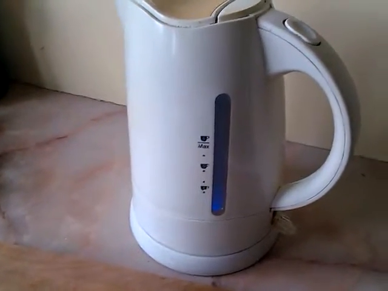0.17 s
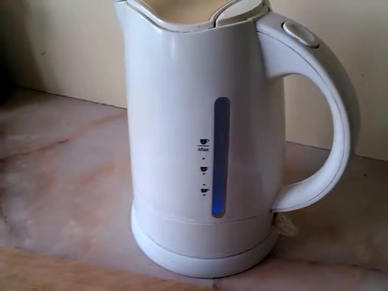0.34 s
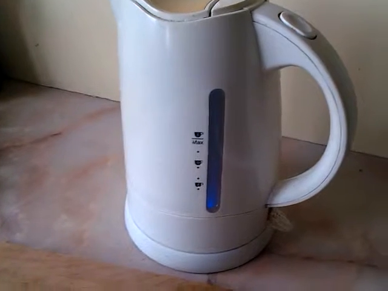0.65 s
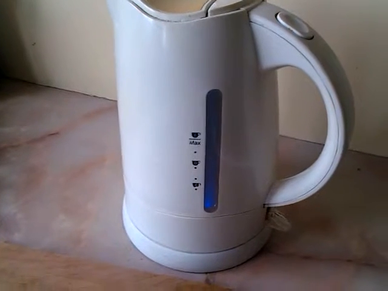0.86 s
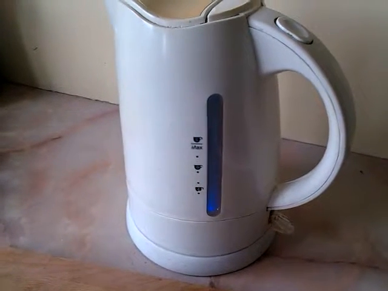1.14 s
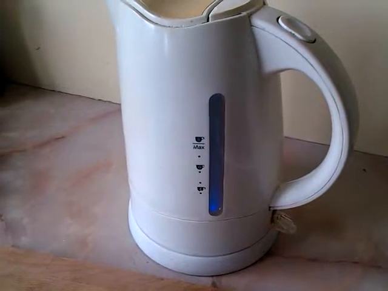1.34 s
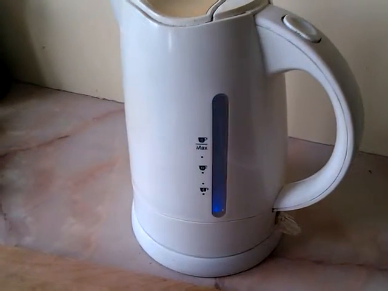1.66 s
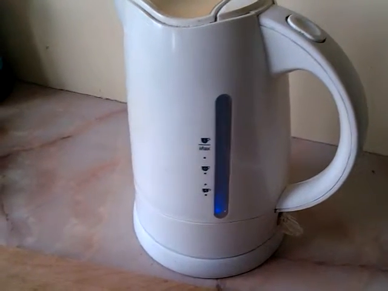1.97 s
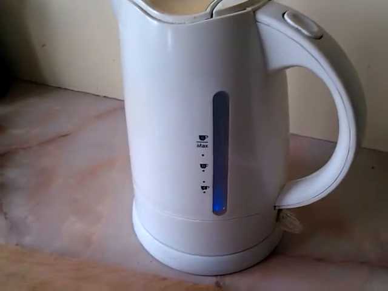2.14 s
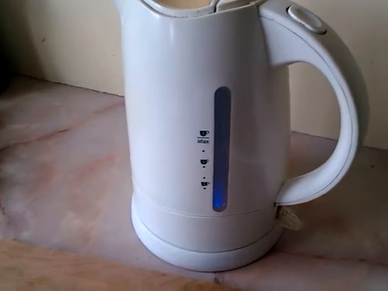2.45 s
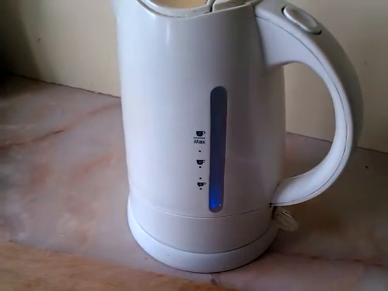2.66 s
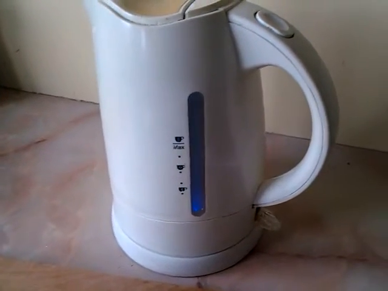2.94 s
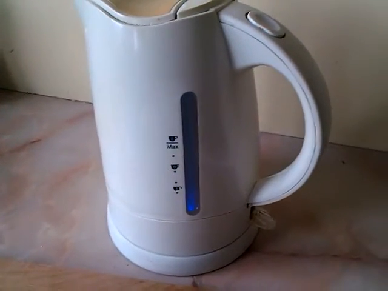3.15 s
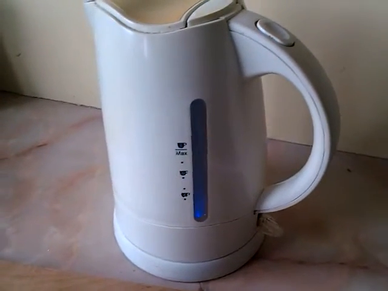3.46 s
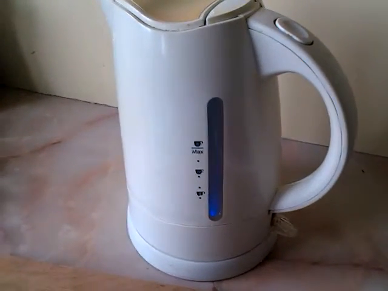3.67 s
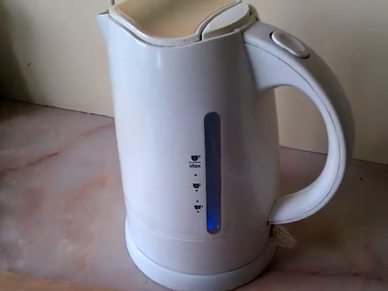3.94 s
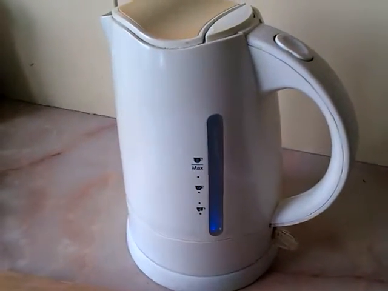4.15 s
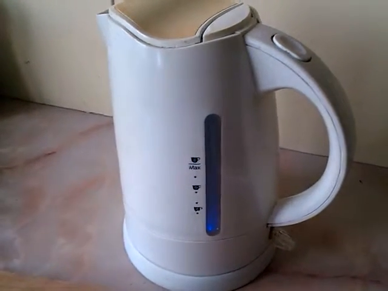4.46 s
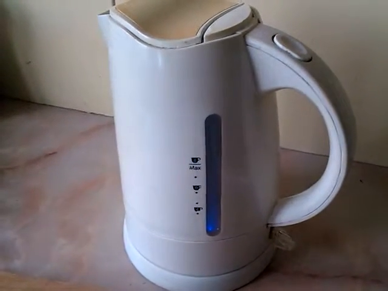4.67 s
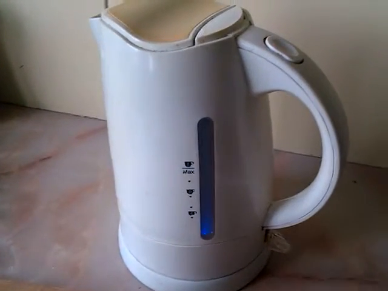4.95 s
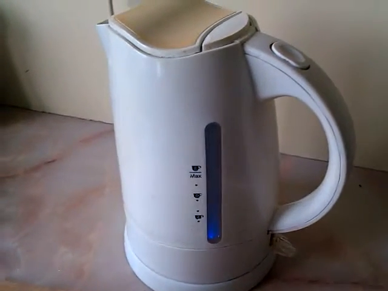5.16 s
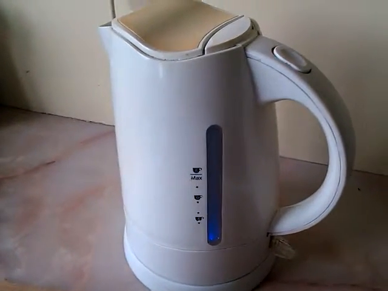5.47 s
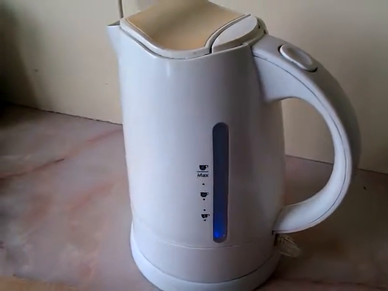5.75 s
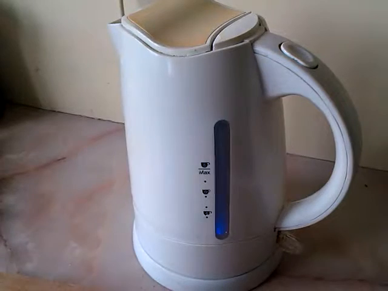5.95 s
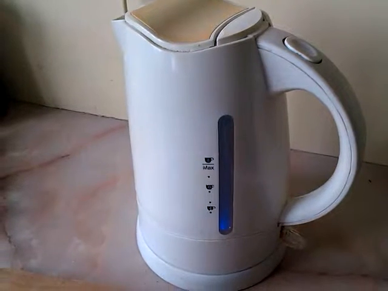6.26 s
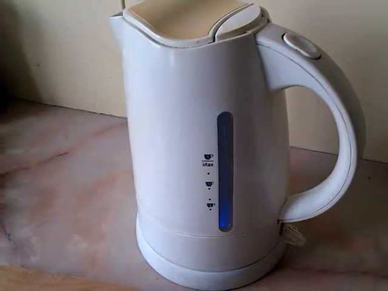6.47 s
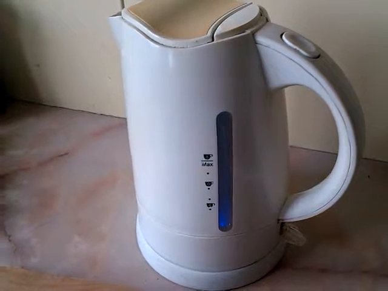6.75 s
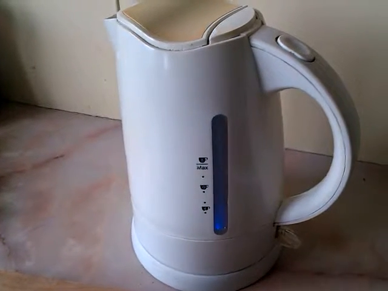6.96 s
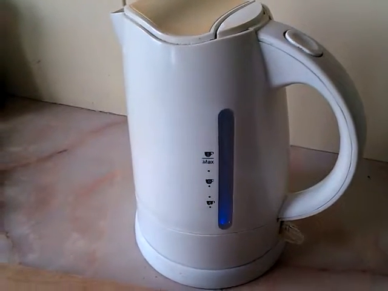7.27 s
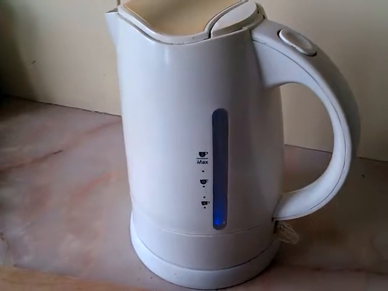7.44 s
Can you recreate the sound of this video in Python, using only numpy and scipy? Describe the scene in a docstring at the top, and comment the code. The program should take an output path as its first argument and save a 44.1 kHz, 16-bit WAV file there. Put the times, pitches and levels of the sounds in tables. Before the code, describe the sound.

Steady fizzing hiss of a kettle warming up, swelling louder, with two sharp wooden knocks late on, echoing briefly in the room.

```python
"""In a kitchen, a plastic electric kettle heats water on a stone worktop. Thousands of steam bubbles collapse
on its element and ring the base, the wall and the air above the water: random clicks through resonances make a
growing, grainy hiss. Tones add a murmur, soft gulps, faint singing and one tick of the plastic. Elsewhere
something wooden, perhaps a cupboard door, bangs shut and bumps; a second hard knock, from another object,
follows and settles. These are noise bursts through wood resonances. Faint air noise and a hum lie underneath."""
import sys
import numpy as np
from scipy import signal
from scipy.fft import rfft, irfft
from scipy.io import wavfile
from scipy.ndimage import uniform_filter1d

SR = 44100
rng = np.random.default_rng(int(sys.argv[2]) if len(sys.argv) > 2 else 0)


def file_out(sig):
    """Save sig as 16-bit WAV at sys.argv[1]."""
    # one column per channel
    cols = np.atleast_2d(sig).T
    # limit, then scale
    lim = np.clip(cols, -1, 1)
    pcm = np.round(lim * 32767).astype(np.int16)
    wavfile.write(sys.argv[1], SR, pcm)


N = 335601
TIME = np.arange(N) / SR

# colour of the air noise in the quiet room: [f/Hz, relative level/dB]
ROOM_COLOUR = [(20, 0.5), (50, -16.5), (100, -14.5), (250, -8), (500, -1.5), (2000, -16.5), (9000, -55.5)]
# modes of the thin tick from the plastic: [f/Hz, relative level/dB, t60/s]
TICK_MODES = [(4560, -3.5, 0.13), (6160, -7, 0.15), (6760, -13, .06), (7290, -11, 0.093)]
# contacts as the wood slams, chatters and bumps, then as another object knocks hard and settles: [t/s, relative
# level/dB, contact time/ms, rattle t60/s, room share/dB]
KNOCK_CONTACTS = [(5.6333, 12.5, 0.39, .033, -5), (5.6351, 14.5, .36, 0.038, -4),
                  (5.6463, 12.5, 0.4, 0.056, -4), (5.680, 8.5, 0.96, .08, 0.5), (5.698, 6, 1.7, .08, 0),
                  (5.716, 3.5, 1.3, .1, 1.5), (5.742, 1, 1.6, 0.074, 0), (6.078, -3.5, 1.6, .1, 0),
                  (6.098, 1.5, .9, .06, -4), (6.112, 1, 1, 0.095, 0), (6.19, -10, 1.6, 0.1, 2),
                  (7.4575, 8, 1.7, 0.034, -3.5), (7.492, .5, 4, .1, 1), (7.5475, 0, 1.6, .04, -1.5)]
# where a hard edge lands and shakes the room: [t/s, clack gain/dB, ring gain/dB, boom gain/dB]
EDGE_HITS = [(5.635, -6, -23, -15), (5.697, -20, -32, -24), (6.094, -42, -36, -40), (7.4574, 2.5, -34, -13),
             (7.5475, -16, -42, -28)]
# what the wood rings with: [f/Hz, relative level/dB, t60/s]
WOOD_MODES = [(107, -13, .6), (131, -8, .25), (189, -7, 0.28), (221.3, -12, .3), (268, -9, .2),
              (404, -10, .4), (526, -3, .34), (608, -2, 0.38), (701, -1.5, .3), (791, -5, .3),
              (840, -0.5, 0.3), (881, .5, 0.21), (898, 1.5, 0.21), (1015, -2, .25), (1318, -4, 0.15),
              (1610, -4, .12), (1750, -4, 0.11)]
# overall colour of the wood: [f/Hz, relative level/dB]
WOOD_COLOUR = [(30, -36.5), (70, -21.5), (120, -12.5), (260, -6.5), (370, -4.5), (900, -0.5), (1600, -7),
               (3000, -10), (4800, -9.5), (8000, -18), (11000, -34), (16000, -45)]
# the short clack of a hard edge: [f/Hz, relative level/dB, t60/s]
CLACK_MODES = [(980, -13.5, 0.029), (1316, -15, 0.04), (1400, -1, 0.002), (1750, -22, .015)]
# the kitchen's deepest modes: [f/Hz, relative level/dB, t60/s]
BOOM_MODES = [(40, -24.5, 0.69), (64, -26, .35), (79, -25, .4), (110, -24, 0.6)]
# loose bubbles that gulp softly: [t/s, starting pitch f/Hz, peak level/dB, swell time/s]
GULP_EVENTS = [(.005, 378, -46, 0.012), (.74, 368, -49, .025), (1.38, 392, -45.5, 0.02),
               (1.49, 393, -47, 0.017), (1.56, 388, -43, .012), (2.14, 610, -42, 0.016),
               (2.19, 403, -48, .025), (2.62, 374, -45, 0.018), (2.99, 369, -46, 0.016),
               (3.55, 388, -44.5, 0.026), (3.59, 224, -48.5, 0.019), (4.585, 394, -40.5, 0.028),
               (4.89, 585, -42, .018)]
# thin singing lines, before the swell below: [f/Hz, grain width/Hz, level/dB]
SINGING_LINES = [(4322, 14, -51), (5160, 40, -62), (5220, 26, -58)]
# how the singing comes and goes: [t/s, gain/dB]
SINGING_SWELL = [(3.6, -30), (4.0, -4), (4.22, 2), (4.55, -4), (4.9, .5), (5.1, -2), (5.28, 3), (5.5, -3),
                 (5.85, 1), (6.05, -2), (6.25, 3), (6.55, -1), (7.6, -2)]
# murmur in the hollow above the water: [f/Hz, width/Hz, level at full heat/dB]
SIMMER_TONES = [(153.1, 14, -61), (372.4, 18, -59), (400, 20, -59)]
# heating makes the hiss climb, quickly at first: [t/s, level against full level/dB]
HEATING = [(0, -8.3), (.38, -8.3), (.62, -5.5), (.82, -5.5), (1.3, -5), (1.55, -3.5), (2.05, -2.5),
           (2.55, -1.9), (3.1, -2), (3.75, -2), (4.5, -1), (5.5, -1), (5.95, -0.34), (6.3, -0.5), (6.9, 0),
           (7.6, -0.1)]
# colour of the collapses through the water and the wall: [f/Hz, relative level/dB]
FIZZ_COLOUR = [(60, -58), (130, -27), (240, -28.5), (340, -19.5), (500, -21), (700, -19.5), (900, -12),
               (1090, -9.5), (1180, -3.5), (2700, -1), (3150, -8), (4000, -12.5), (6300, -21), (8200, -34),
               (9200, -49.5), (10000, -73.5), (12000, -90.5)]
# resonances of the air above the water, then of base and wall: [f/Hz, width/Hz, lift or dip/dB]
KETTLE_RESONANCES = [(153.3, 14, 7.5), (385, 81, 3), (488, 20, -5), (603.7, 31, 11.5), (673, 37, -3.5),
                     (917, 21, 3.5), (1108, 22, -9.5), (1206, 130, 2.5), (1490, 37, -4.5), (1594, 70, 2.7),
                     (2190, 16, 2.5), (2230, 20, 1.5), (2433, 28, 2.5), (2487, 60, 6), (2690, 80, 1),
                     (2850, 50, -5), (2944, 73, 3), (3310, 51, 2.5), (3870, 260, -1.5), (4480, 66, -0.5),
                     (5020, 99, -1.5), (5640, 120, 2.5)]
# single big collapses: [t/s, relative level/dB]
POP_EVENTS = [(.652, -21), (1.531, -18), (1.6428, -14.5), (1.8966, -16.5), (2.3359, -17), (2.545, -16),
              (2.61, -15), (2.886, -17.5), (3.619, -15), (3.808, -16.5), (3.8366, -15.5), (4.3993, -15),
              (4.536, -15.5), (4.8753, -16), (5.283, -14), (5.882, -14.5), (6.512, -14.5), (6.7733, -13.5),
              (7.1975, -12.5)]


def undb(db):
    """Turn decibels into gain."""
    return 10 ** (np.asarray(db) / 20)


def unit(x):
    """Scale to rms 1."""
    return x / np.sqrt(np.mean(x ** 2))


def burst(x):
    """Scale to energy 1."""
    return x / np.sqrt(np.sum(x ** 2))


def fade(t, t60):
    """Exponential decay, 60 dB down after t60 seconds."""
    return np.exp(-np.log(1000) * t / t60)


def add(out, s, sound):
    """Mix a sound in from time s on."""
    start = max(int(s * SR), 0)
    out[start:start + len(sound)] += sound[:max(N - start, 0)]


def ring(x, response):
    """Let a signal excite whatever has this impulse response."""
    return signal.fftconvolve(x, response)[:len(x)]


def low_pass(x, hz, order=2):
    """Keep what lies below hz."""
    return signal.sosfilt(signal.butter(order, hz, fs=SR, output="sos"), x)


def band(x, lo_hz, hi_hz, order=3):
    """Keep what lies between two frequencies."""
    edges = [lo_hz, min(hi_hz, SR / 2 - 1)]
    return signal.sosfilt(signal.butter(order, edges, "bandpass", fs=SR, output="sos"), x)


def body(colour, resonances=(), size=16384):
    """Response of an object with a broad colour and resonances; it sounds only after being hit."""
    hz = np.fft.rfftfreq(size, 1 / SR)
    points, dbs = np.transpose(colour)
    db = np.interp(np.log(hz + 1), np.log(points), dbs)
    for centre, width, lift_db in resonances:
        db = db + lift_db / (1 + (2 * (hz - centre) / width) ** 2)
    # folding the cepstrum forward gives minimum phase: the energy comes as early as possible
    cepstrum = irfft(np.log(undb(db)))
    cepstrum[1:size // 2] *= 2
    cepstrum[size // 2 + 1:] = 0
    response = irfft(np.exp(rfft(cepstrum)))
    return burst(response[:size // 2])


def struck(modes):
    """One second of decaying sines, as from a struck object."""
    t = TIME[:SR]
    return sum(undb(db) * np.sin(2 * np.pi * hz * t) * fade(t, t60) for hz, db, t60 in modes)


def walk(rate):
    """Random levels held for 1 / rate s, then smoothed twice and scaled to rms 1."""
    hold = int(SR / rate)
    steps = np.repeat(rng.standard_normal(N // hold + 2), hold)
    smooth = uniform_filter1d(uniform_filter1d(steps, hold), hold)
    return unit(smooth[:N])


def scatter(t60):
    """Dense random reflections that die away, energy 1."""
    return burst(rng.standard_normal(SR) * fade(TIME[:SR], t60))


def kitchen(build_s=0.0035, split_hz=1500, bass_hz=330):
    """The room's echo builds up in a few ms and dies away, the bass lasting longest."""
    bass = low_pass(scatter(t60=0.47), bass_hz)
    middle = band(scatter(t60=0.41), bass_hz, split_hz, order=2)
    treble = band(scatter(t60=0.41), split_hz, SR / 2, order=2)
    return burst((bass + middle + treble) * (1 - np.exp(-TIME[:SR] / build_s)))


def room_tone(air_db=-54.5, hum_hz=261, hum_db=-65.5):
    """Faint coloured air noise and a steady pitch whose level wavers slightly."""
    air = unit(ring(rng.standard_normal(N), body(ROOM_COLOUR)))
    hum = np.sin(2 * np.pi * hum_hz * TIME) * undb(hum_db + 1.5 * walk(5.1))
    return undb(air_db) * air + hum


def blow(contact_ms, rattle_t60, room_db, push_db=-6, rattle_top_hz=5200, soft_ratio=6):
    """A short push, a rattle of the wood and the room's answer; the longer the contact, the duller."""
    sound = low_pass(scatter(rattle_t60) + undb(room_db) * kitchen(), rattle_top_hz)
    sound[0] += undb(push_db)
    contact_hz = 1000 / contact_ms
    return low_pass(low_pass(sound, contact_hz, order=1), soft_ratio * contact_hz)


def knocks(boom_rise_s=0.041, lift_db=5.0, panel_rise_s=0.0015, echo_db=-19):
    """Each contact rattles the wood; a hard edge adds a clack, rings the panel and makes the room boom."""
    blows, clacks, tones = np.zeros((3, N))
    boom = struck(BOOM_MODES) * (1 - np.exp(-TIME[:SR] / boom_rise_s))
    clack = band(struck(CLACK_MODES), lo_hz=880, hi_hz=2700, order=2)
    panel = struck(WOOD_MODES) * (1 - np.exp(-TIME[:SR] / panel_rise_s))
    for at, db, contact_ms, t60, room_db in KNOCK_CONTACTS:
        add(blows, at, undb(db) * blow(contact_ms, t60, room_db))
    for at, clack_db, ring_db, boom_db in EDGE_HITS:
        add(clacks, at, undb(clack_db) * clack)
        add(tones, at, undb(ring_db) * panel + undb(boom_db) * boom)
    # a mode that rings longer has a narrower resonance
    resonances = [(hz, np.log(1000) / (np.pi * t60), lift_db) for hz, _, t60 in WOOD_MODES]
    wood = ring(blows, body(WOOD_COLOUR, resonances, size=32768))
    return wood + clacks + undb(echo_db) * ring(clacks, kitchen()) + tones


def tick(at_s=6.567, ring_db=-30, rise_s=0.002, snap_db=-27, snap_t60=0.061, echo_db=-8):
    """The warming plastic slips once: a small noise snap and a brief ring of its modes."""
    out = np.zeros(N)
    add(out, at_s, undb(ring_db) * struck(TICK_MODES) * (1 - np.exp(-TIME[:SR] / rise_s)))
    snap = band(rng.standard_normal(SR) * fade(TIME[:SR], snap_t60), lo_hz=3900, hi_hz=7400, order=8)
    add(out, at_s, undb(snap_db) * snap)
    return out + undb(echo_db) * ring(out, kitchen())


def gulps(glide_per_s=0.3):
    """Each loose bubble swells into a short, soft tone that rises a little as it climbs."""
    out, t = np.zeros(N), TIME[:SR // 3]
    for at, hz, db, swell_s in GULP_EVENTS:
        phase = 2 * np.pi * hz * (t + glide_per_s * t ** 2 / 2)
        swell = t / swell_s * np.exp(1 - t / swell_s)
        add(out, at, undb(db) * swell * np.sin(phase))
    return out


def singing(waver_hz=20, flicker_db=1.2, rough=0.7):
    """The hot kettle sings: thin lines, wavering in pitch and level, follow the swell table."""
    out = np.zeros(N)
    for hz, width_hz, db in SINGING_LINES:
        phase = 2 * np.pi * np.cumsum(hz + waver_hz * walk(30)) / SR
        grain = 1 + rough * unit(low_pass(rng.standard_normal(N), width_hz / 2))
        out += undb(db) * unit(grain * np.sin(phase) * undb(flicker_db * walk(8)))
    return out * undb(np.interp(TIME, *np.transpose(SINGING_SWELL)))


def simmer(patchy_db=3.5, patch_per_s=6.5, growth=0.85):
    """Stirring water sets the hollow murmuring in patches; it grows a little less than the hiss."""
    out = np.zeros(N)
    for hz, width_hz, db in SIMMER_TONES:
        tone = band(rng.standard_normal(N), hz - width_hz / 2, hz + width_hz / 2, order=2)
        out += undb(db) * unit(unit(tone) * undb(patchy_db * walk(patch_per_s)))
    return out * undb(growth * np.interp(TIME, *np.transpose(HEATING)))


def pops(lo_hz=1000, hi_hz=3200, slosh_t60=0.05, slosh_db=2, strike_db=7.6):
    """A single big collapse is a click and its echoes inside the water."""
    out = np.zeros(N)
    for at, db in POP_EVENTS:
        pop = undb(slosh_db) * scatter(slosh_t60)
        pop[0] += 1
        add(out, at, undb(db) * burst(band(pop, lo_hz, hi_hz, order=2)))
    return undb(strike_db) * out


def collapses(rate, spread_db, slosh_t60, slosh_db, spots=20):
    """Clicks of uneven size from several spots on the element, each spot with its own water echoes."""
    out = np.zeros(N)
    for _ in range(spots):
        strikes = rng.random(N) < rate / spots / SR
        size = undb(spread_db * np.minimum(rng.exponential(size=N), 3.5))
        path = undb(slosh_db) * scatter(slosh_t60)
        path[0] += 1  # the direct click
        out += ring(strikes * size * rng.choice([-1, 1], N), path)
    # more clicks make denser grain; their growing level is evened out here
    return unit(out / np.sqrt(rate))


def kettle(big_hz=1550, fine_hz=3100, drive_db=-27.5, flutter_db=0.31, echo_db=-9.5):
    """The hotter the water, the more bubbles collapse and the more big ones count; a few pop out."""
    cool_db = np.interp(TIME, *np.transpose(HEATING))  # level against full heat
    activity = undb(cool_db)
    # collapses per second at full heat: few big low ones, so many fine ones that they merge into fizz
    big = collapses(2000 * activity, spread_db=2.5, slosh_t60=0.025, slosh_db=1.5)
    medium = collapses(3800 * activity, spread_db=3.5, slosh_t60=0.03, slosh_db=-3.0)
    fine = collapses(14000 * activity, spread_db=1.5, slosh_t60=0.014, slosh_db=2)
    # big bubbles come late and the finest early, in dB per dB of heating
    big = band(big, 23, big_hz) * undb(2.5 + 0.55 * cool_db + 0.7 * walk(30))
    medium = band(medium, big_hz, fine_hz) * undb(0.5 * walk(35))
    fine = band(fine, fine_hz, 19000) * undb(-0.3 * cool_db)
    crowd = (big + medium + fine) * undb(drive_db + cool_db + flutter_db * walk(22))
    hiss = ring(crowd + pops(), body(FIZZ_COLOUR, KETTLE_RESONANCES))
    return hiss + undb(echo_db) * ring(hiss, kitchen())


def scene():
    """Room, wood and kettle together, in one channel."""
    background = room_tone() + knocks()
    heating_water = tick() + gulps() + singing() + simmer() + kettle()
    return (background + heating_water)[None]


def record(dry, bass_hz=33, top_hz=15800):
    """The microphone drops the deepest bass, rounds the loudest peaks and cuts the top."""
    no_rumble = signal.sosfilt(signal.butter(4, bass_hz, "highpass", fs=SR, output="sos"), dry)
    rounded = np.tanh(no_rumble)
    return signal.sosfilt(signal.ellip(8, 0.2, 70, top_hz, fs=SR, output="sos"), rounded)


dry = scene()
out = record(dry)
file_out(out)
```